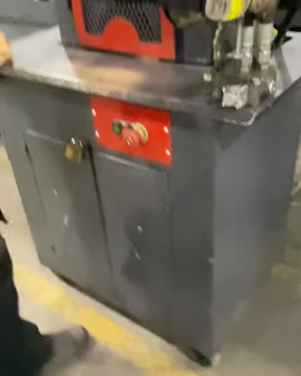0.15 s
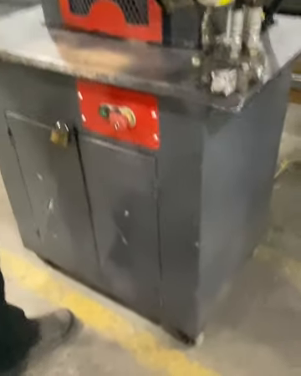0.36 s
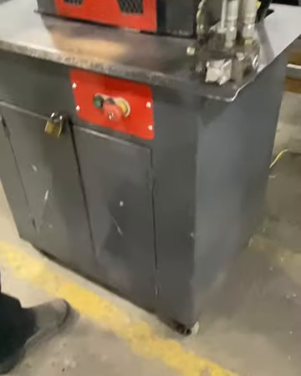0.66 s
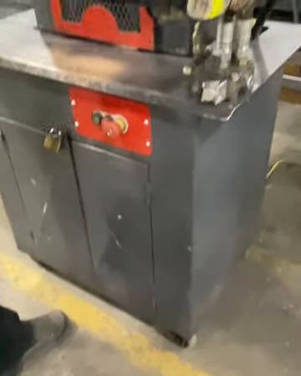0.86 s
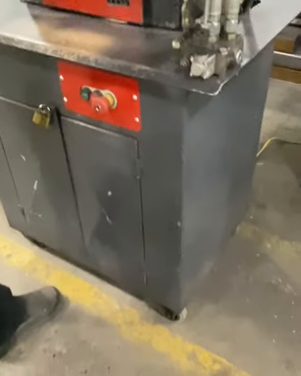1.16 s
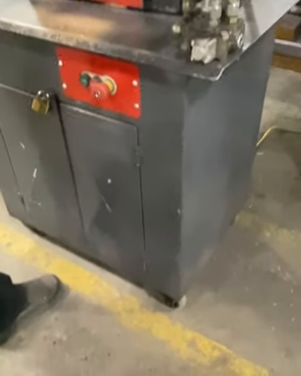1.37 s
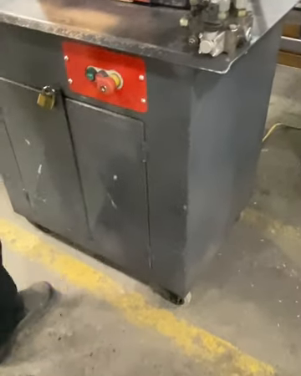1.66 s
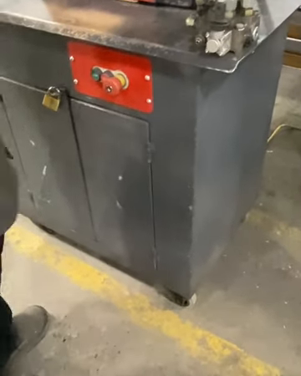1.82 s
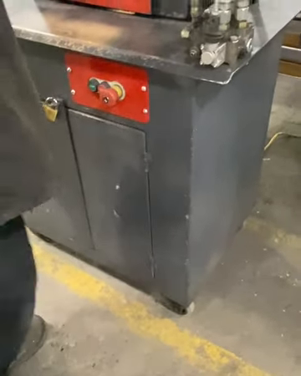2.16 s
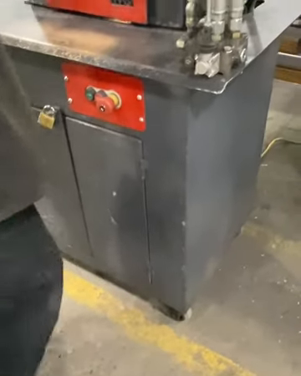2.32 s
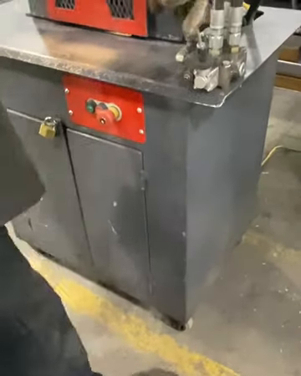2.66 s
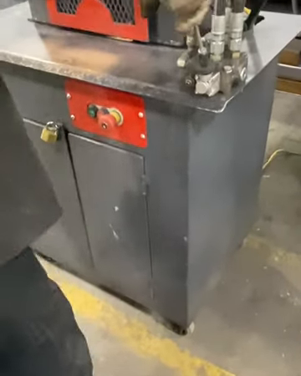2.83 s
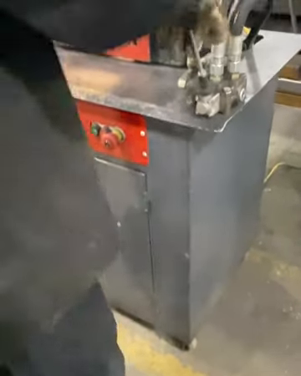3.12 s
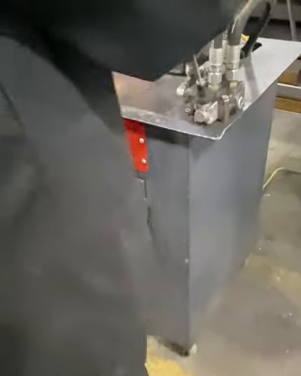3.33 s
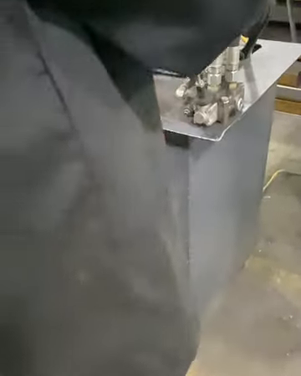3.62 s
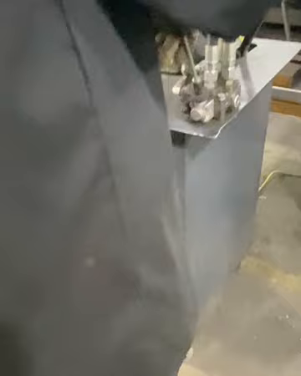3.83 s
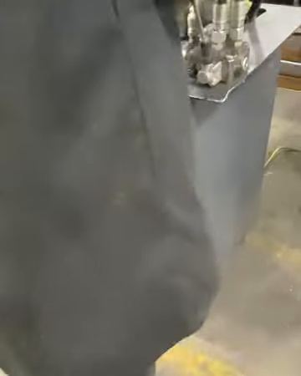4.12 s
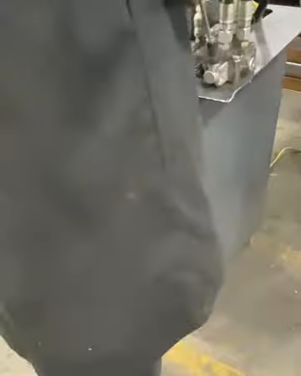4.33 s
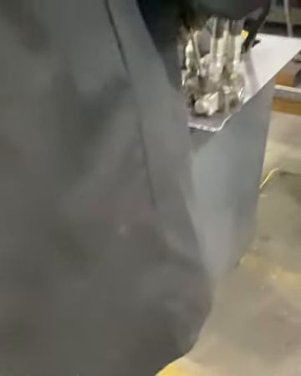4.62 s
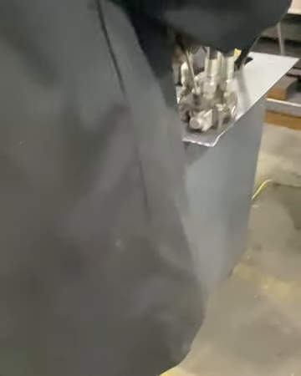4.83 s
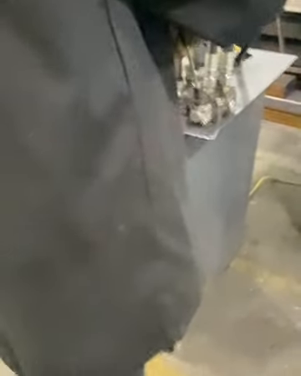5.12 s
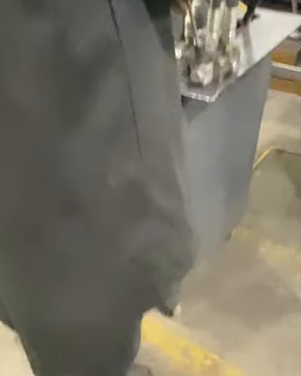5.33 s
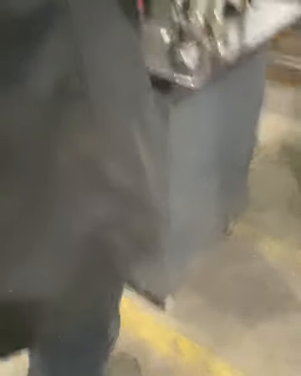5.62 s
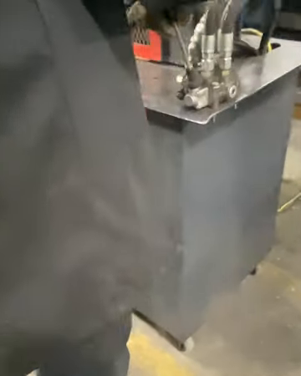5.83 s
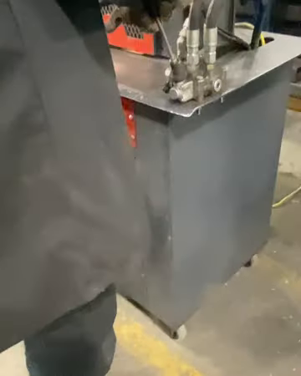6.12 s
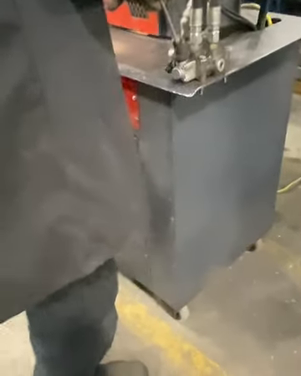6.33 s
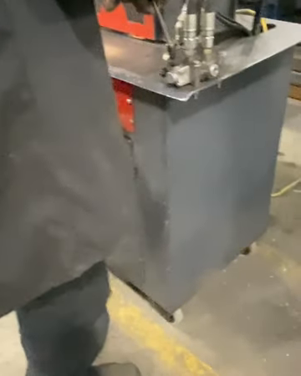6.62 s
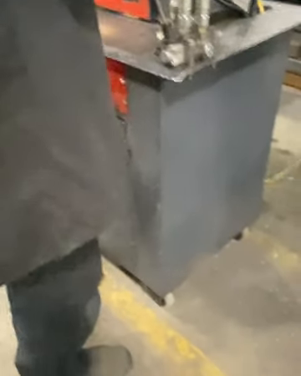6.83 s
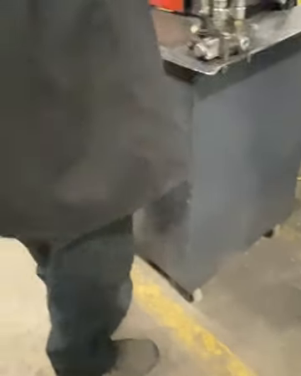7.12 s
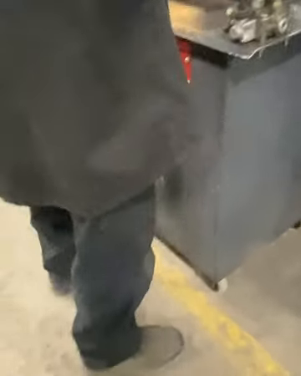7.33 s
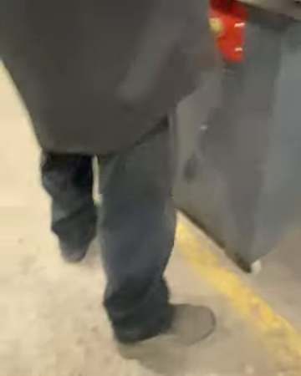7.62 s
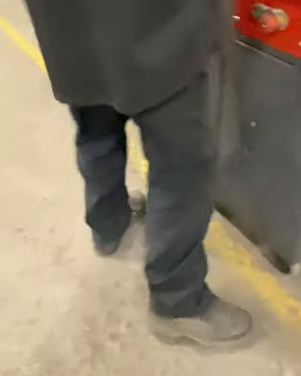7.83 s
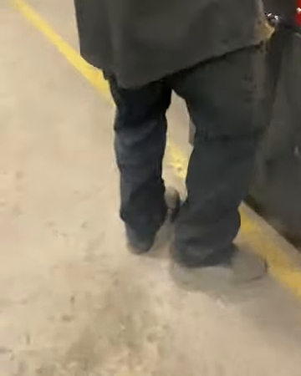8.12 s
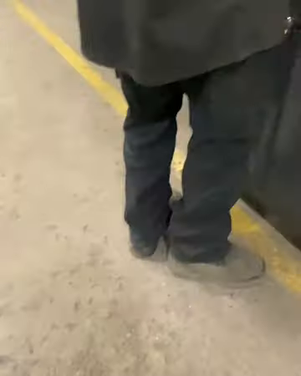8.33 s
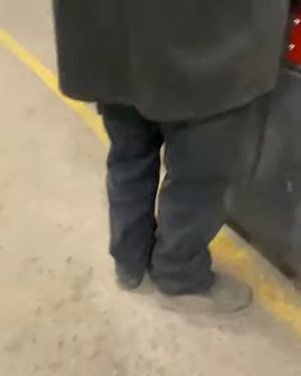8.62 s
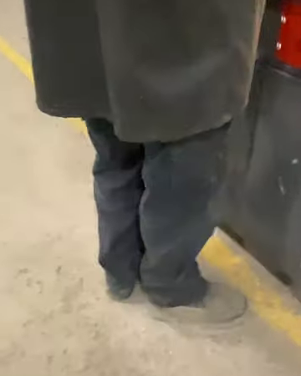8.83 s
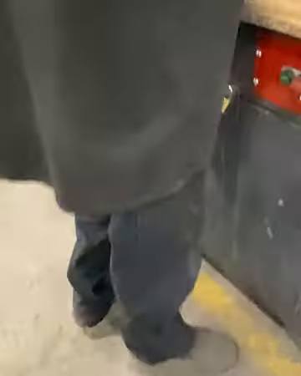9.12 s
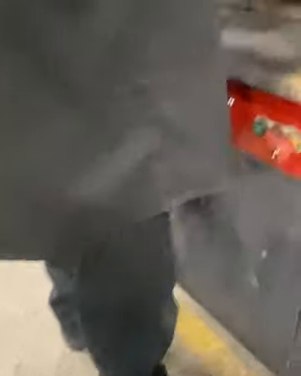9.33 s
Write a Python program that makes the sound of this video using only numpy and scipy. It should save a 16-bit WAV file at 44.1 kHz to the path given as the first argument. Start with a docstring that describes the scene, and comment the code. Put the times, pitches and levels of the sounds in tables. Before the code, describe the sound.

Oily rush and thin high whine from a hydraulic machine, straining higher as it presses steel, then dropping away to hard metallic clanks and a bright ting.

```python
"""A pump runs first: cabinet rumble, the rush of oil and a thin whine, from a step away in a workshop.
Noise bands make rumble, rush and hiss; the whine is a set of sines locked to one gliding pump shaft.
As a hydraulic ram bends a steel plate the pitch climbs, overshoots and settles; on release it runs down.
Then steel parts scrape and ring in the die, the plate clanks loose and a small piece chimes:
decaying modes struck or rubbed by short noise, with a diffuse hall tail."""
import sys
import numpy as np
from scipy import signal
from scipy.fft import irfft, next_fast_len
from scipy.io import wavfile
from scipy.ndimage import uniform_filter1d

SR = 44100
rng = np.random.default_rng(int(sys.argv[2]) if len(sys.argv) > 2 else 0)


def put_to_file(sound):
    """Save the sound as 16-bit audio at rate SR, in the file named by the first command-line argument."""
    columns = np.atleast_2d(sound).T  # one column per channel
    safe = np.clip(columns, -1, 1)
    whole_steps = np.round(safe * 32767)
    wavfile.write(sys.argv[1], SR, whole_steps.astype(np.int16))


N = 417186
T = np.arange(N) / SR
HZ = np.fft.rfftfreq(1024, 1 / SR)  # frequency grid for decay times
EDGE_HZ = 15900  # upper band limit

# Pump noise: t/s, rumble level/dB, oil rush level/dB (both before trim)
FLOW = [(0.0, -46.5, -42), (2.0, -44, -41), (2.4, -47.5, -43), (2.52, -40, -37), (2.79, -40.5, -33.3),
        (3.25, -41, -38.5), (3.8, -47, -48), (4.08, -48, -49), (4.52, -39, -40), (5.04, -40.5, -40.5),
        (6.52, -40, -38.0), (7.08, -42, -40), (7.67, -43, -47.0), (8.16, -42, -43), (8.55, -41, -51.5),
        (8.86, -43.5, -42), (9.14, -39, -51), (9.44, -39.5, -54)]
# Spectra of cabinet rumble, oil rush and valve hiss: f/Hz, level/dB per Hz
RUMBLE_SPECTRUM = [(25, -43), (42, -21.5), (70, -10.5), (105, -9.5), (135, -1), (180, -4), (245, -0.5),
                   (310, -3), (440, -3), (650, -8), (1000, -15), (2000, -49.5)]
RUSH_SPECTRUM = [(350, -40), (700, -8.5), (950, -7), (1400, -4.5), (1750, -3), (2050, 0.5), (2300, 3.5),
                 (2550, 3), (2900, -4.5), (3200, -6), (4200, -12.5), (5000, -21.5), (7000, -80)]
HISS_SPECTRUM = [(2500, -26), (3500, 7.5), (4100, 9), (5000, 2.5), (5700, 3.5), (6500, 3.5), (7300, -24.5),
                 (8300, -7), (9900, -7.5), (10700, -11.5), (11300, -16), (12150, -20), (12700, -47),
                 (16000, -71)]
# Motor hum and cabinet resonances: f/Hz, width/Hz, level/dB relative to the rumble
CABINET_LINES = [(57, 1, -30), (74, 1.5, -21), (148.4, 1.8, -10.5), (243, 9, -15), (307, 5.3, -20),
                 (745, 14, -20)]
# Ringing of the pipes: f/Hz, width/Hz, level/dB relative to the rush
PIPE_LINES = [(2020, 23, -14), (2520, 38, -15)]
# Stereo image of noise: f/Hz, likeness of left and right (used within 0-1)
STEREO_LIKENESS = [(140, 1), (290, 1.02), (640, .5), (1410, 0.81), (3100, -0.25), (6800, 1), (15000, 0.56)]
# f/Hz, phase lead of the left/rad
LEFT_LEAD = [(130, 0), (1300, 0.46), (2150, 0), (2500, 1.4), (3900, -0.5), (7000, 3.5), (10000, 0.4)]
# f/Hz, left minus right/dB
PUMP_SIDES = [(200, 0.16), (380, 1.0), (700, -1.1), (2380, -0.025), (4400, -0.71), (8120, 0.3)]

# Main whine, swelling and fading in the room's standing waves: t/s, level/dB (before trim)
WHINE_LEVEL = [(0.0, -53), (0.22, -60), (0.46, -49.5), (0.68, -59), (0.85, -47), (0.96, -60), (1.12, -46),
               (1.38, -45), (1.62, -62), (1.7, -43), (2.02, -52.5), (2.16, -43.5), (2.32, -61), (2.41, -45),
               (2.455, -45), (2.468, -31.5), (2.495, -39), (2.535, -34), (2.565, -29), (2.66, -24),
               (2.705, -39), (2.735, -26), (2.767, -45), (2.793, -26.5), (2.85, -63), (2.945, -32),
               (3.01, -22), (3.07, -44), (3.12, -39.5), (3.17, -49), (3.9, -68), (4.1, -52), (4.24, -36),
               (4.32, -47), (4.94, -50.5), (5.01, -32.5), (5.23, -47), (5.3, -40), (5.385, -47),
               (5.42, -29.5), (5.75, -36.5), (5.85, -28), (6.01, -35), (6.36, -26), (6.64, -33.5),
               (6.95, -35.5), (6.988, -33.5), (7.03, -49), (7.25, -72)]
# Where the main whine is heard from: t/s, left minus right/dB
WHINE_SIDE = [(2.3, 2), (2.46, -19), (2.54, 6), (2.58, -9), (2.67, 5), (2.81, -9), (3.0, -1), (4.0, -11),
              (4.24, 12), (4.32, -3), (4.94, 0), (5.04, -29), (5.29, 9), (5.42, 15), (5.77, 11),
              (5.86, -14), (6.01, -13.5), (6.38, 3.5), (6.64, -11), (7.0, -2)]
# Octave of the main whine: t/s, level/dB (before the overshoot surge)
OCTAVE_LEVEL = [(0.05, -67), (1.2, -79), (1.35, -59), (2.35, -76), (2.55, -41.5), (2.9, -41), (3.8, -71.5),
                (4.4, -55), (5.3, -74), (6.15, -42), (6.25, -51.5), (6.95, -52.5)]
# Lower tone, order 15 of the shaft: t/s, level/dB
LOWER_LEVEL = [(0.0, -60), (0.46, -49.5), (0.68, -64), (0.88, -52), (1.26, -38.5), (1.35, -48.5),
               (1.6, -52.5), (2.2, -50.5), (2.4, -59), (3.1, -53), (3.33, -50), (4.2, -59), (4.9, -46.5),
               (5.48, -52.5), (6.1, -41), (6.95, -43)]
# Faint shaft orders, one for each of FAINT_ORDERS: level/dB relative to the untrimmed rush, before fading
FAINT_DB = [-14.5, -20, -19, -28, -22]

# Valve spurts, a swell of the pump's faint tenth-order tone, rubs, taps, thuds,
# ringing of the clanked plate and a floor scuff:
# t/s, level/dB, rise/s, t60/s, centre f/Hz, half-width/octaves
SPURTS = [(2.485, -45, 0.0084, 0.089, 11000, 1), (3.19, -41.5, 0.067, 1.2, 2915, 0.0062),
          (4.19, -39.5, 0.029, 0.64, 1890, 0.22), (4.71, -41, 0.072, 1.2, 1810, 0.34),
          (7.128, -41, 0.01, 0.13, 11000, 0.28), (7.128, -36, .015, 0.18, 3500, 0.57),
          (7.28, -32.5, 0.029, 0.37, 1630, 0.18), (7.352, -49.5, .008, 0.094, 10000, 0.32),
          (7.52, -33.5, 0.0036, 0.24, 1280, 0.047), (8.446, -44, 0.0029, 0.039, 8550, 0.026),
          (8.604, -50, 0.012, 0.15, 9400, 0.4), (8.606, -42, 0.0094, 0.099, 5430, 0.027),
          (8.648, -28, 0.016, 0.18, 2070, 0.12), (8.652, -34.5, 0.014, 0.12, 289, 0.073),
          (8.69, -41, .02, 0.28, 3300, .02), (8.712, -34.5, 0.016, 0.21, 2090, 0.05),
          (8.8, -41.5, 0.12, 0.24, 3380, 0.016), (9.265, -31, 0.03, 0.092, 153, 0.28)]
# Clanks: t/s, level/dB, rise/s, ring factor, tilt/dB per octave,
# left minus right in the lows/dB, pitch factor of the clear modes
CLANKS = [(7.131, -37, 0.012, 1.6, -5, -2, 1), (7.272, -34, 0.0058, 3.3, 3.5, 5, 1),
          (7.522, -34.5, 0.0067, 5.8, -1.5, 4, 0.93), (7.575, -37.5, 0.0056, 1.5, -4, 4, 1),
          (7.792, -28, .004, 1.2, 4, -2, 0.97), (7.8105, -12, 0.0014, 0.67, 2, -2, 0.99),
          (7.817, -14.5, 0.0026, 0.68, -3, -3, 0.98), (7.868, -24, 0.021, 0.43, -3, -12, 1),
          (8.236, -37.5, 0.0072, 5.2, 0.5, 2, 0.87), (8.630, -27, 0.006, 0.81, 11.5, -5, 0.93),
          (8.643, -19.5, 0.016, 0.95, 2.5, -7, 0.96), (8.674, -26.5, 0.0025, 0.67, 3.5, -8, 0.98),
          (9.363, -29.5, 0.0034, 0.87, 7, -16, 0.95)]
# Plate on the bed, spectrum: f/Hz, level/dB per Hz
PLATE_SPECTRUM = [(45, -60), (120, -33), (230, -5), (330, -11), (420, -14.5), (520, -5), (980, 1),
                  (1320, -1.5), (1600, -4), (2300, -7.5), (3000, -7.5), (4000, -11), (5500, -14),
                  (7300, -30.5), (10000, -36), (15500, -57)]
# Its ring time before the ring factor: f/Hz, t60/s
PLATE_T60 = [(200, 0.11), (600, 0.21), (2200, 0.22), (5000, 0.12), (12000, 0.15)]
# Its clear modes before ring and pitch factors: f/Hz, t60/s, level/dB added to the spectrum
PLATE_MODES = [(257.4, 0.12, 1), (473, 0.33, 2), (680, 0.16, 5.5), (957, 0.12, 2), (1113, 0.14, 4),
               (1586, 0.1, 7.5), (1720, 0.21, 3), (2180, 0.25, 4.5), (2800, 0.1, 7.5), (3400, 0.16, 5)]
# Steel sliding in the die: t/s, level/dB, rise/s, t60/s, favoured f/Hz, boost there/dB
SCRAPES = [(7.245, -33.5, 0.0086, 0.08, 6450, 30), (7.253, -34.5, 0.011, 0.13, 4560, 26),
           (7.266, -30, 0.0074, 0.26, 2560, 19), (7.499, -34.5, 0.012, 0.12, 6400, 27),
           (7.537, -40, 0.008, 0.1, 5700, 22), (7.716, -40, 0.0065, 0.08, 4560, 19),
           (7.743, -23.5, 0.01, 0.18, 2600, 4), (7.759, -23.5, 0.01, 0.11, 4600, 6),
           (7.770, -24, 0.011, 0.11, 1750, 8), (7.988, -28.5, 0.013, 0.23, 5600, 5),
           (8.018, -35, 0.0087, 0.1, 2000, 13), (8.212, -29.5, 0.0098, 0.081, 2600, 4.5),
           (8.233, -35.5, 0.0056, 0.18, 5400, 9)]
# Modes of the steel die: f/Hz (before detuning), level/dB (before the boost), t60/s
DIE_MODES = [(1700, 0, 0.28), (1995, -4, 0.42), (2524, 2, 0.13), (2556, -5.5, 0.36), (3155, -11.5, 0.1),
             (4540, -13, 0.11), (4945, -16, 0.27), (5005, -2.5, 0.23), (5115, -8.5, 0.26),
             (5600, -13, 0.11), (6110, -17, 0.16), (6250, -17.5, 0.059), (7900, -20, 0.08),
             (10350, -21.5, 0.053)]
# Touches of the small steel piece, then late swells of its ringing tail:
# t/s, level/dB, rise/s, pitch factor
CHIMES = [(8.605, -33.5, 0.0084, 0.98), (8.921, -15.5, 0.013, 0.99), (8.963, -23.5, 0.015, 0.99),
          (9.022, -40, 0.012, 0.996), (9.07, -46, 0.014, 0.996), (9.141, -34.5, 0.0084, 0.99),
          (9.207, -36.5, 0.021, 0.99)]
# Its modes before the pitch factor: f/Hz, level/dB, t60/s
CHIME_MODES = [(2825, -17, 0.081), (3870, 5.5, 0.074), (3870, -9, 0.06), (5160, -22, 0.062),
               (7800, -40, 0.054), (8400, -22, 0.12)]
# Decay of the hall: f/Hz, t60/s
HALL_T60 = [(150, 0.17), (1000, 1), (3000, 0.34), (10000, 0.29)]

# The ram takes up the load, and is released
LOAD_S, RELEASE_S = 2.402, 6.958
# Pitch of the main whine: idling, creeping up, then under load
IDLE_HZ, CREEP_HZ_PER_S, LOADED_HZ = 4212, 46, 4906
# Time constant of the climb, one overshoot, and the run-down
CLIMB_S, OVERSHOOT_HZ, OVERSHOOT_AFTER_S, RUN_DOWN_HZ_PER_S = 0.143, 100, 0.52, 5600
# Orders of the pump shaft
LOWER_ORDER, MAIN_ORDER, FAINT_ORDERS = 15, 17, (10, 11, 14, 16, 18)
# Left minus right of the lower tone under load; lift of the octave at the overshoot
LOWER_SIDE_DB, OCTAVE_SURGE_DB = -11, 2.5
# Idling gives way to load over the first; the side tones die at the second on release
HANDOVER_S, RUN_DOWN_DB_PER_S = 0.2, 400
# In a standing-wave node the loaded whine flutters: below this level, fully this much lower, this deep
NODE_DB, NODE_RANGE_DB, NODE_FLUTTER = -39.5, 17, 0.32
# A wall echo beats with the gliding whine, which also wavers more in level
ECHO_S, ECHO_SHARE, GLIDE_FLUTTER = 0.0417, 0.62, 0.12
# Valve hiss: share of the rush's swells, offset, build-up with pressure
HISS_FOLLOWS, HISS_DB, HISS_BUILD_DB_PER_S = 0.72, -18, 0.58
# It falls to a resting level over this time on release
HISS_REST_DB, VALVE_SHUT_S = -59, 0.8
# High sizzle while the ram presses: start, level, centre and half-width
SIZZLE_S, SIZZLE_DB, SIZZLE_HZ, SIZZLE_WIDTH_HZ = 4.33, -59, 10600, 160


def amp(db):
    """Decibels to gain."""
    return 10 ** (np.asarray(db) / 20)


def unit(x):
    """Scales to rms 1."""
    return x / np.sqrt(np.mean(abs(x) ** 2) + 1e-20)


def crest(x):
    """Scales a stereo hit so that its loudest 10 ms have rms 1."""
    power = uniform_filter1d((x ** 2).mean(0), SR // 100)
    return x / np.sqrt(power.max() + 1e-20)


def read(points, hz):
    """Reads a spectrum on a log-frequency axis."""
    f, value = np.transpose(points)
    return np.interp(np.log(hz + 1), np.log(f + 1), value)


def curves(rows):
    """Each column of a time table, at every sample."""
    s, *columns = np.transpose(rows)
    return [np.interp(T, s, c) for c in columns]


def add(mix, s, sound):
    """Mixes a stereo sound in at time s."""
    part = mix[:, round(s * SR):][:, :sound.shape[1]]
    part += sound[:, :part.shape[1]]


def pan(db):
    """Left and right gains of constant power, from left minus right in dB."""
    g = amp(np.array([db, -db]).reshape(2, -1) / 2)
    return g / np.sqrt((g ** 2).mean(0))


def wander(hz):
    """Slow complex random motion of rms 1, with a bell-shaped spectrum about hz wide."""
    hop = 20  # samples between drawn points
    f = np.fft.fftfreq(next_fast_len(N // hop + 2), hop / SR)
    z = np.fft.ifft(np.exp(-(f / hz) ** 2 / 2 + 2j * np.pi * rng.random(len(f))))
    return unit(np.interp(np.arange(N) / hop, np.arange(len(f)), z))


def noise(colour_db, size):
    """Stereo noise of a given colour; likeness and phase lead of the sides vary with frequency."""
    padded = next_fast_len(size)
    f = np.fft.rfftfreq(padded, 1 / SR)
    left, other = np.exp(2j * np.pi * rng.random((2, len(f))))
    same = np.clip(read(STEREO_LIKENESS, f), 0, 1)
    right = (same * left + np.sqrt(1 - same ** 2) * other) * np.exp(-1j * read(LEFT_LEAD, f))
    return unit(irfft(np.array([left, right]) * amp(colour_db(f)), padded)[:, :size])


def swell(t, rise, t60):
    """Rises smoothly, then dies away."""
    attack = np.sin(np.pi / 2 * np.minimum(t / rise, 1)) ** 2
    return attack * np.exp(-np.log(1000) * np.maximum(t - rise, 0) / t60)


def fade(x, t60):
    """Lets each band die at its own speed; t60 is given at HZ."""
    hz, t, z = signal.stft(x, SR, nperseg=256)
    z = z * np.exp(-np.log(1000) * t / np.interp(hz, HZ, t60)[:, None])
    return signal.istft(z, SR, nperseg=256)[1][:, :x.shape[1]]


def workshop(x):
    """A diffuse tail from the hall, arriving just after the direct sound; highs and lows die sooner."""
    t = np.arange(SR) / SR
    onset = np.clip(t / 0.014 - .5, 0, 1)
    tail = fade(rng.standard_normal((2, SR)) * onset, read(HALL_T60, HZ))
    return signal.fftconvolve(x, tail / np.linalg.norm(tail[0]), axes=1)[:, :N]


def pump(rumble_db=-0.05, rush_db=0.26, churn_db=1.38):
    """The cabinet rumbles and hums; churning oil rushes in the pipes and hisses in the valve."""
    rumble, rush = curves(FLOW)
    shut = np.clip((T - RELEASE_S) / VALVE_SHUT_S, 0, 1)
    build = HISS_BUILD_DB_PER_S * np.maximum(T - LOAD_S, 0)
    open_hiss = HISS_FOLLOWS * rush + HISS_DB + build
    hiss = (1 - shut) * open_hiss + shut * HISS_REST_DB
    churn = churn_db * wander(14.6).real

    def layer(spectrum):
        halves = np.array([[.5], [-.5]])
        return noise(lambda f: read(spectrum, f) + halves * read(PUMP_SIDES, f), N)

    def hum(lines):
        # a slow random envelope gives each line its width
        return sum(amp(db) * np.sqrt(2) * (wander(width / 2) * np.exp(2j * np.pi * hz * T)).real
                   for hz, width, db in lines)

    body = amp(rumble + rumble_db) * (layer(RUMBLE_SPECTRUM) + hum(CABINET_LINES))
    oil = amp(rush + rush_db + churn) * (layer(RUSH_SPECTRUM) + hum(PIPE_LINES))
    return body + oil + amp(hiss + churn) * layer(HISS_SPECTRUM)


def surge():
    """The overshoot of the pump after it takes up the load: one hump, 0-1."""
    u = np.maximum(T - LOAD_S, 0) / OVERSHOOT_AFTER_S
    return (u * np.exp(1 - u)) ** 7


def pitch():
    """The whine creeps up while idling, climbs to its loaded pitch, and runs down on release."""
    idle = IDLE_HZ + CREEP_HZ_PER_S * np.minimum(T, LOAD_S)
    load = 1 - np.exp(-np.maximum(T - LOAD_S, 0) / CLIMB_S)
    run_down = RUN_DOWN_HZ_PER_S * np.maximum(T - RELEASE_S, 0)
    return np.maximum(idle + load * (LOADED_HZ - idle) + OVERSHOOT_HZ * surge() - run_down, 0)


def whine(flutter=0.13, flutter_hz=34, skirt_db=-25, strain_skirt_db=-14, skirt_hz=210, whine_db=0.5,
          waver_hz=1.76, smear_db=-17, fading_share=0.9, fading_hz=3.5):
    """Pump orders share one shaft phase; strain adds grainy skirts, and glides beat with an echo."""
    hz = pitch()
    phase = 2 * np.pi * np.cumsum(hz + waver_hz * wander(6.14).real) / SR / MAIN_ORDER
    slope = np.gradient(uniform_filter1d(hz, SR // 20)) * SR  # Hz per second
    gliding = np.tanh(abs(slope) / 700)
    depth = flutter + GLIDE_FLUTTER * gliding
    echo = ECHO_SHARE * (T < RELEASE_S) * gliding ** 3
    skirt = amp(skirt_db) + amp(strain_skirt_db) * np.maximum(gliding, surge())

    def tone(depth, order):
        delayed = np.exp(-2j * np.pi * hz * order / MAIN_ORDER * ECHO_S)
        beat = (1 + echo * delayed) / np.sqrt(1 + echo ** 2)
        shared = beat * (1 + depth * wander(flutter_hz))
        field = np.array([shared + skirt * wander(skirt_hz) for side in range(2)])
        left_lead = np.exp(1j * np.array([[.7], [0]]))
        carrier = np.exp(1j * order * phase) * left_lead
        return np.sqrt(2 / (1 + depth ** 2)) * (field * carrier).real

    def fading():
        # slow drift through the standing waves, in dB
        return fading_share * 20 * np.log10(abs(wander(fading_hz)) + 0.044)

    loaded = np.clip((T - LOAD_S) / HANDOVER_S + 1, 0, 1)
    level_db = curves(WHINE_LEVEL)[0] + whine_db
    node = loaded * np.clip((NODE_DB - level_db) / NODE_RANGE_DB, 0, 1)
    sides = pan(curves(WHINE_SIDE)[0])
    main = amp(level_db) * sides / sides.mean(0) * tone(depth + NODE_FLUTTER * node, MAIN_ORDER)
    octave_db = curves(OCTAVE_LEVEL)[0] + OCTAVE_SURGE_DB * surge()
    octave = amp(octave_db) * tone(depth + 0.56, 2 * MAIN_ORDER)
    lower_gain = amp(curves(LOWER_LEVEL)[0]) * pan(LOWER_SIDE_DB * loaded)
    lower = lower_gain * tone(depth + 0.12, LOWER_ORDER)
    rush_db = curves(FLOW)[1]
    faint = sum(amp(rush_db + db + fading()) * tone(depth + 0.41, order)
                for order, db in zip(FAINT_ORDERS, FAINT_DB))
    run_down = amp(-RUN_DOWN_DB_PER_S * np.maximum(T - RELEASE_S, 0))
    direct = main + (octave + lower + faint) * run_down
    # the hall still holds the pitch that a gliding tone has just left
    return direct + amp(smear_db) * workshop(direct * gliding)


def spurt(level_db, rise, t60, centre_hz, octaves, edge_db=7):
    """A short swell of noise in one band: a hiss, a rub or a scuff if wide, a tone or ring if narrow."""
    t = np.arange(SR // 2) / SR

    def colour_db(f):
        away = abs(np.log2((f + 1) / centre_hz))
        return -20 * np.log10(1 + (away / octaves) ** 2) - edge_db * away

    return amp(level_db) * crest(noise(colour_db, len(t)) * swell(t, rise, t60))


def sizzle():
    """A thin band of hiss that sets in as the ram presses and ends on release."""
    pressing = uniform_filter1d(1.0 * ((T > SIZZLE_S) & (T < RELEASE_S)), SR // 10)

    def colour_db(f):
        return -20 * np.log10(1 + ((f - SIZZLE_HZ) / SIZZLE_WIDTH_HZ) ** 2)

    return amp(SIZZLE_DB) * pressing * noise(colour_db, N)


def clank(level_db, rise, ring, tilt_db, side_db, tuning, modes_db=-3, panel_hz=1500):
    """A blow rings the crowded, quickly damped modes of plate and bed; a few stand out."""
    t = np.arange(SR // 2) / SR

    def colour_db(f):
        # the low modes of the panels radiate to one side
        lean_db = np.array([[.5], [-.5]]) * side_db / (1 + (f / panel_hz) ** 2)
        return read(PLATE_SPECTRUM, f) + tilt_db * np.log2(np.clip(f, 300, 6000) / 1000) + lean_db

    body = fade(noise(colour_db, len(t)), ring * read(PLATE_T60, HZ))
    clear = 0
    for hz, t60, db in PLATE_MODES:
        # the sides differ in phase more towards the treble
        phase = 2 * np.pi * rng.random() + rng.standard_normal((2, 1)) * hz / 1200
        decay = np.exp(-np.log(1000) * t / (t60 * ring))
        clear = clear + amp(db + colour_db(hz)) * np.sin(2 * np.pi * hz * tuning * t + phase) * decay
    attack = np.minimum(t / rise, 1) ** 2
    return amp(level_db) * crest((unit(body) + amp(modes_db) * unit(clear)) * attack)


def scrape(level_db, rise, t60, favoured_hz, favour_db, favour_octaves=0.088, knock_db=-8,
           grit_db=-2, grit_width_hz=260, detune=0.0061, soft_s=0.0032):
    """Tiny slips ring the die; while the parts touch, its modes are damped to broad gritty bands."""
    t = np.arange(SR // 2) / SR
    stroke = swell(t, rise, t60)
    slips = rng.standard_normal((2, len(t))) * stroke
    slips = (slips + 0.14 * slips[::-1]) / np.linalg.norm(stroke)  # a little of each side in the other
    slips[:, round(rise / 2 * SR)] += amp(knock_db)  # the parts knock together
    modes = []
    ringing = 0
    for hz, db, ring in DIE_MODES:
        # each contact point favours the modes near one frequency
        boost_db = favour_db / (1 + (np.log2(hz / favoured_hz) / favour_octaves) ** 2)
        gain = amp(db + boost_db)
        modes.append((hz, gain))
        tuned_hz = hz * (1 + detune * rng.uniform(-1.06, 1))
        mode = np.sin(2 * np.pi * tuned_hz * t) * swell(t, soft_s, ring)
        ringing = ringing + gain * unit(signal.fftconvolve(slips, mode[None], axes=1)[:, :len(t)])

    def grit_colour_db(f):
        power = sum((gain / (1 + ((f - hz) / grit_width_hz) ** 2) ** 2) ** 2 for hz, gain in modes)
        return 10 * np.log10(power)

    grit = noise(grit_colour_db, len(t)) * stroke
    return amp(level_db) * crest(unit(ringing) + amp(grit_db) * unit(grit))


def chime(level_db, rise, tuning, lead=0.81, rasp_db=-16, chatter_db=-13, hang_db=-12.0,
          hang_t60=0.64, hang_delay=0.035):
    """A few clear modes of a small steel piece swell up with a brief rasp; their echo hangs on, beating."""
    t = np.arange(SR) / SR
    left_lead = np.array([[lead], [0]])  # radians
    ring = crest(sum(amp(db) * swell(t, rise, t60) * np.sin(2 * np.pi * hz * tuning * t + left_lead)
                     for hz, db, t60 in CHIME_MODES))
    hang = rng.standard_normal((2, SR)) * swell(t, hang_delay, hang_t60)
    echo = signal.fftconvolve(ring, hang, axes=1)[:, :SR]
    out = ring + amp(hang_db) * crest(echo)
    add(out, 0, spurt(rasp_db, rise, 0.11, 4100, 0.17))
    # chatter of a dragging touch broadens the main mode
    add(out, 0, spurt(chatter_db, rise, 0.3, CHIME_MODES[1][0] * tuning, 0.044))
    return amp(level_db) * pan(1.6) * out


def scene(hall_db=-18):
    """The running pump, and the steel parts and short swells with their hall tail."""
    events = np.zeros((2, N))
    for table, source in ((SPURTS, spurt), (CLANKS, clank), (SCRAPES, scrape), (CHIMES, chime)):
        for s, *row in table:
            add(events, s, source(*row))
    return pump() + whine() + sizzle() + events + amp(hall_db) * workshop(events)


def record(dry):
    """Clips whatever exceeds full scale, then cuts everything above the band limit."""
    low_pass = signal.firwin(511, EDGE_HZ, window=("kaiser", 9), fs=SR)
    return signal.oaconvolve(np.clip(dry, -1, 1), low_pass[None], "same")


dry = scene()
out = record(dry)
put_to_file(out)
```